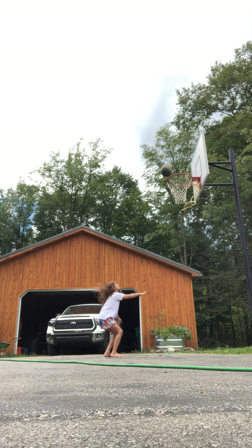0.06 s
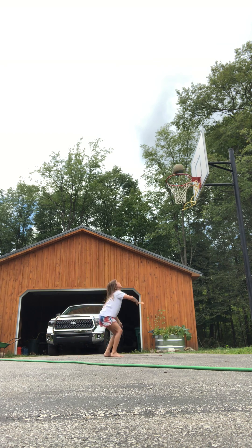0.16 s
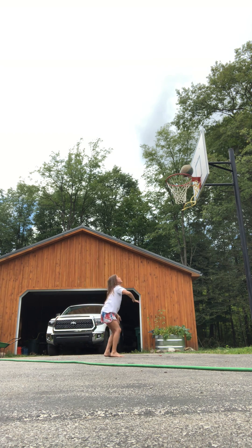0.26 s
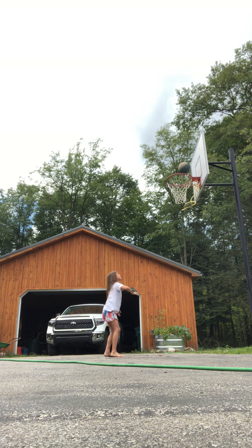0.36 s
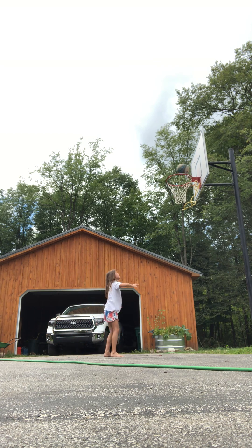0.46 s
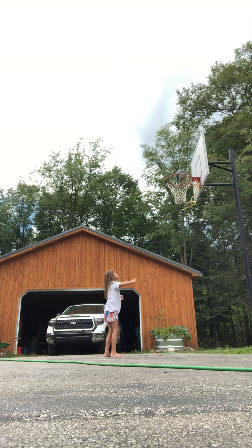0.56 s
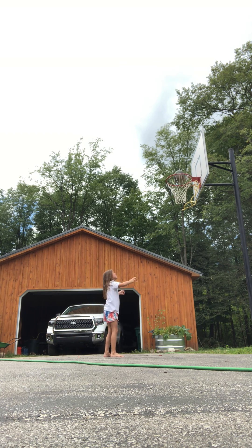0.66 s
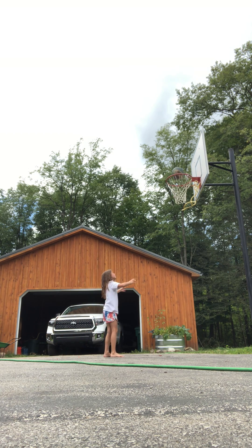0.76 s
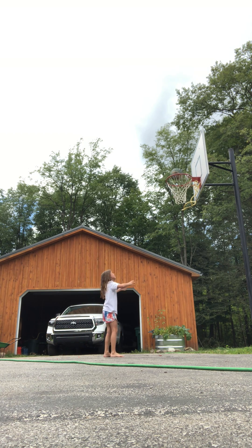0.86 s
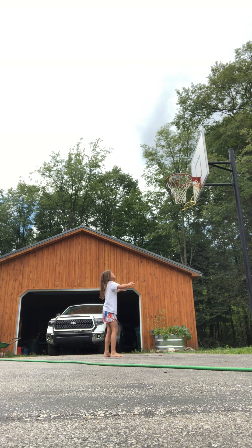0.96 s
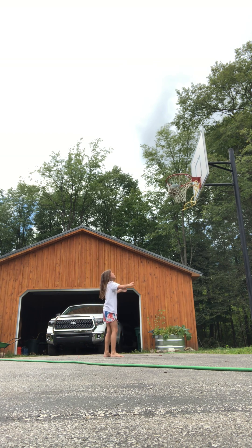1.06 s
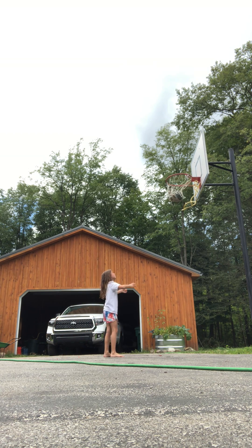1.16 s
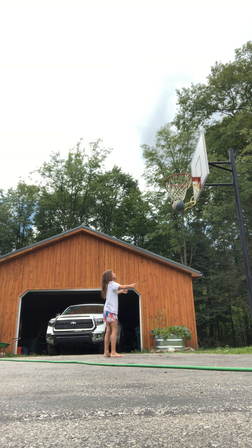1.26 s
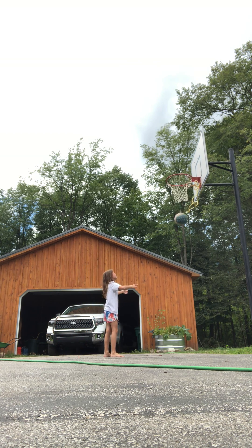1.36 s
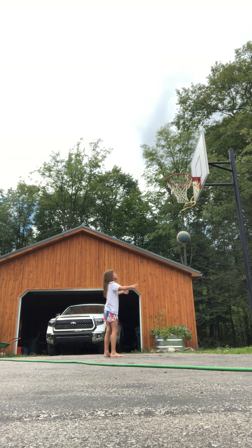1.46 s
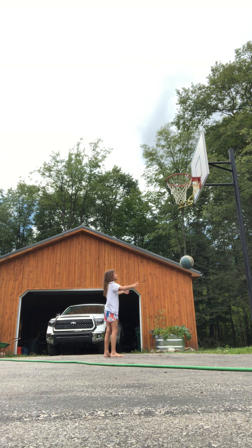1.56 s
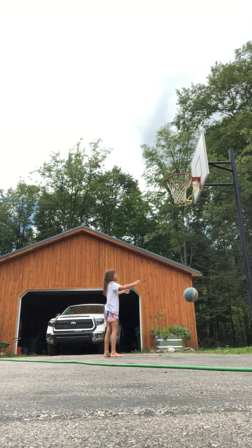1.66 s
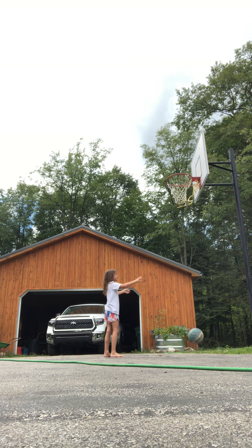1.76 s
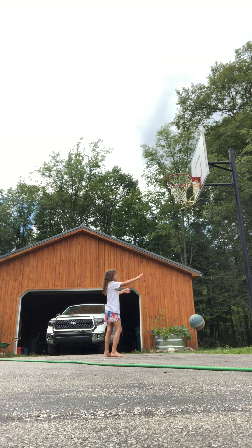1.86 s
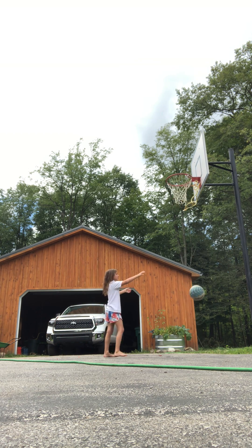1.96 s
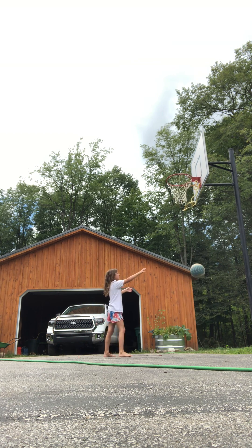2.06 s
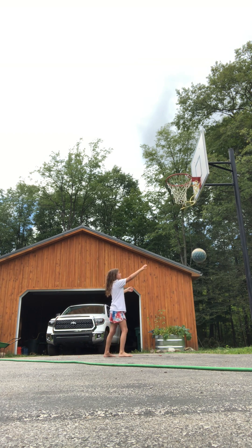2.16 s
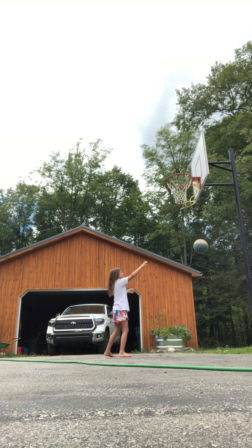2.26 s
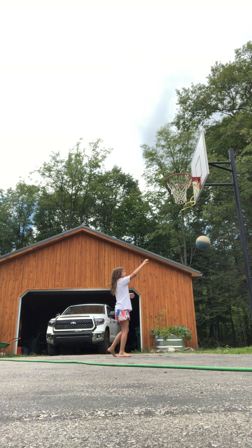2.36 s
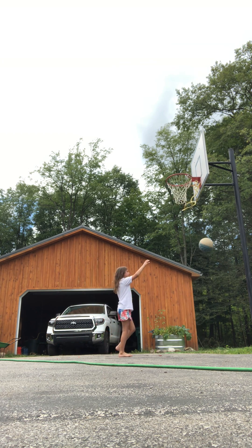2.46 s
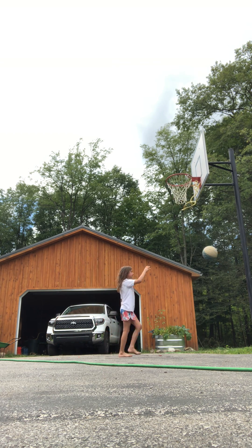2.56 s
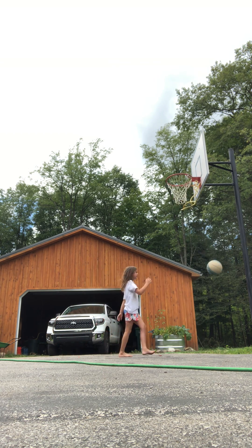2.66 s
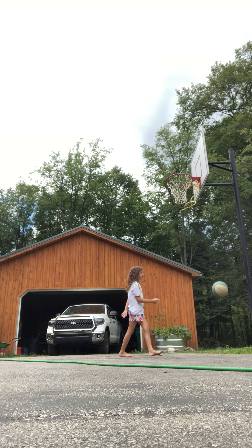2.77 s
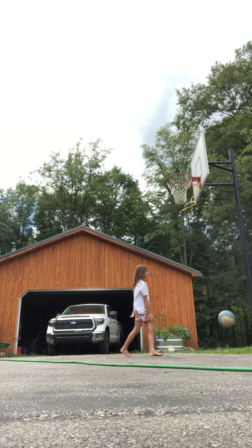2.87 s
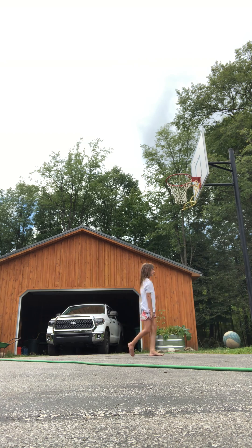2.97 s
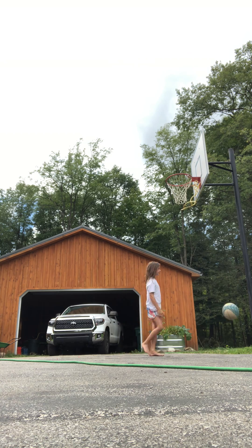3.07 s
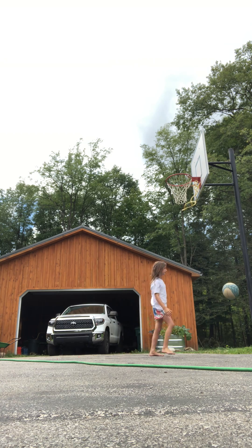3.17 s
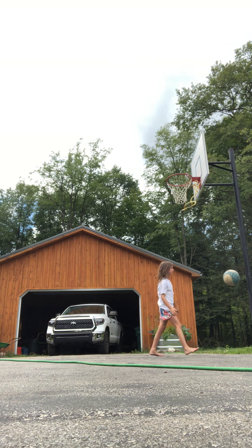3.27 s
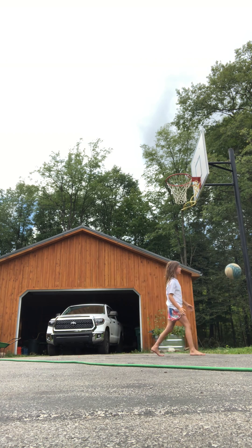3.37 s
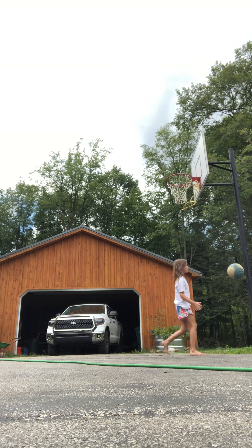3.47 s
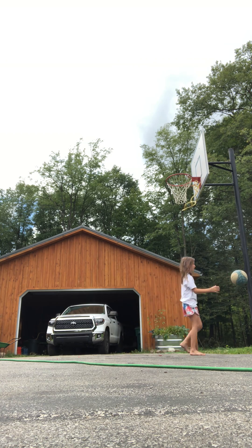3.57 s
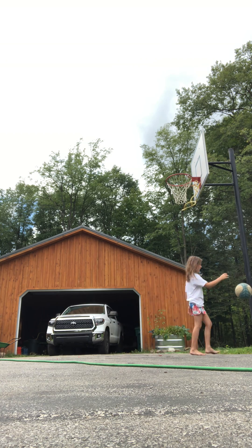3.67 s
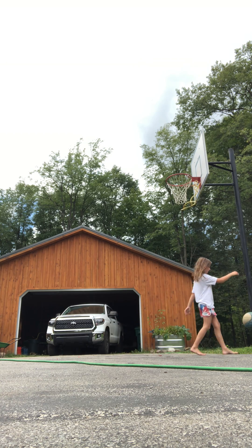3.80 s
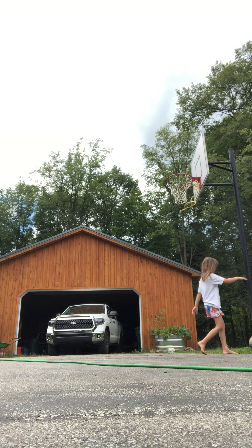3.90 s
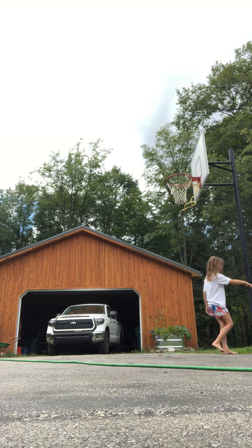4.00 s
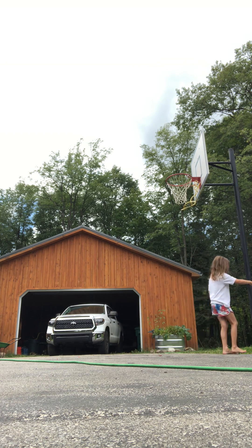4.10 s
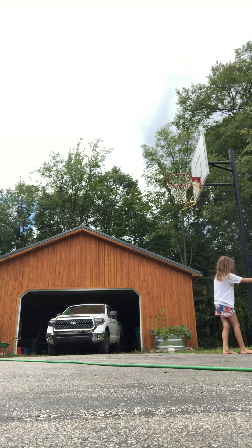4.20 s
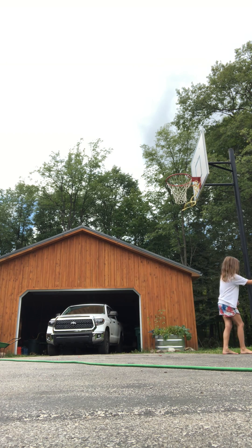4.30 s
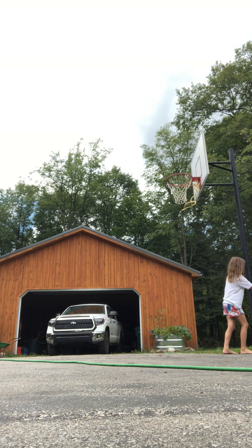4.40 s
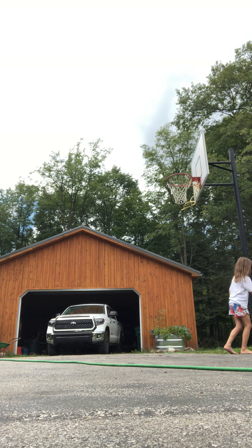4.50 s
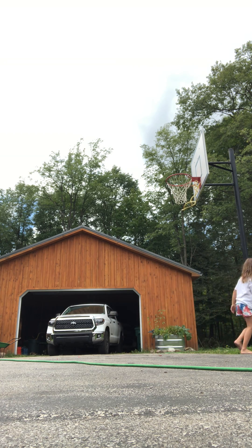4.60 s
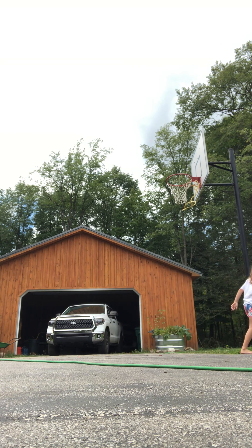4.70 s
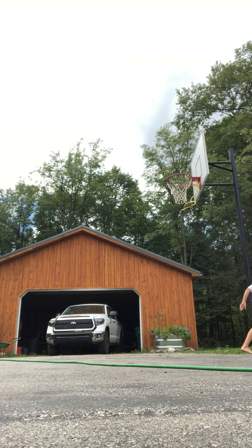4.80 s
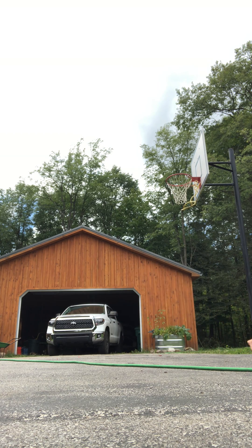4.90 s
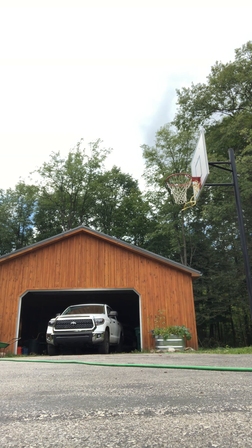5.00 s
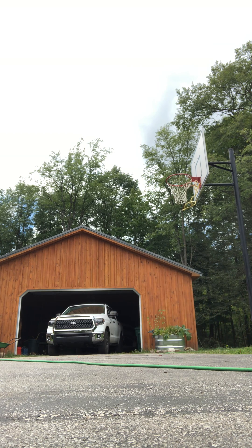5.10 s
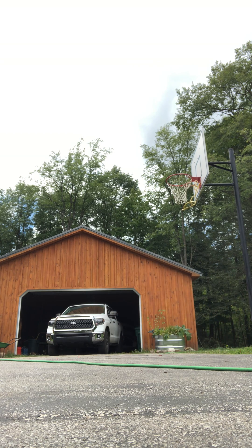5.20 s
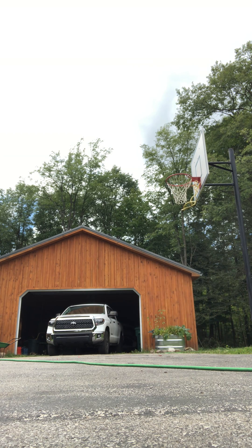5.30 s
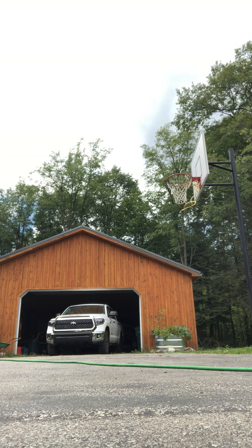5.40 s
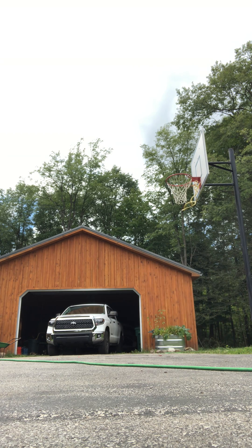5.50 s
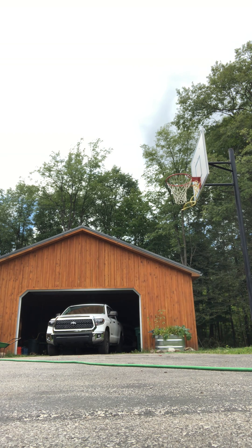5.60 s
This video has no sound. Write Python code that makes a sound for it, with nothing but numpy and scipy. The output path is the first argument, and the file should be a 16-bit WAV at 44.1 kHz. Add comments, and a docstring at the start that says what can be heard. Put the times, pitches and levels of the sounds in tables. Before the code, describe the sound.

A basketball knocks twice on a hoop, swishes through the net, then bounces three times on a driveway, each weaker, amid faint birdsong.

```python
"""A basketball knocks twice on the hoop, drags through the net, bounces three times on an asphalt driveway
and lands softly at its edge. Each blow sends a dispersive wave round the rubber shell, treble first and
thump last, and excites damped modes of the ball and its air. The net, scuffs and rustles are bursts of
shaped noise. Songbirds and a far crow are gliding sines; a garage and trees reflect the sounds.
Quiet outdoor air is coloured noise."""
import sys
import numpy as np
from scipy import signal
from scipy.fft import rfft, irfft
from scipy.io import wavfile

SR = 44100
rng = np.random.default_rng(int(sys.argv[2]) if len(sys.argv) > 2 else 0)


def master(y):
    """Save y as 16-bit WAV."""
    cut = np.clip(np.atleast_2d(y).T, -1, 1)
    pcm = np.round(cut * 32767)  # scale
    wavfile.write(sys.argv[1], SR, pcm.astype(np.int16))


N = 249157
TIME = np.arange(N) / SR
SIZE = 16384  # samples in one blow, burst or echo response
SHORT_TIME = np.arange(SIZE) / SR
FREQ = np.fft.rfftfreq(SIZE, 1 / SR)

# Levels in the tables are those before the final mix; spectra are relative.
# Outdoor air, spectrum of the far rumble: frequency_hz, level_db
RUMBLE_SPECTRUM = [(15, -49), (25, -17), (43, -6.5), (127, 2.5), (185, -1.5), (226, -1.5), (397, -7),
                   (438, -8.5), (977, -12), (3000, -21.5), (3900, -56), (6600, -120)]
# Leaf hiss, spectrum: frequency_hz, level_db
LEAF_SPECTRUM = [(1500, -29.5), (3000, 0.5), (4000, 1.5), (7300, -3), (9000, -6.5), (12000, -8.5),
                 (15500, -13.5)]
RUMBLE_DB, RUMBLE_FADE_DB_PER_S = -66, 0.59

# Hard surfaces that answer the bounces: delay_s, level_db, treble_limit_hz, smear_s
WALL_ECHOES = [(.040, -28, 6000, .005), (.0535, -20, 8000, .0045), (.1222, -23, 7000, .002),
               (.058, -20, 1200, .005), (.075, -22, 1000, .005), (.139, -18, 220, .006)]
# Scatter from the trees, spectrum: frequency_hz, level_db
TREE_SPECTRUM = [(50, -21), (120, -12), (400, -16.5), (1200, -23), (2900, -19), (5800, -16), (11500, -25)]
# Scatter from the trees, decay: frequency_hz, t60_s
TREE_DECAY = [(60, 1), (300, 0.23), (1200, 1), (3000, 0.97), (6000, 0.95), (15000, .35)]

# Caws of a far crow: start_s, level_db, overtone_db
CROW_CAWS = [(.828, -57.5, -26.5), (1.725, -56, -11)]
CAW_S, CAW_HZ, CAW_ARCH, CAW_RASP = 0.13, 1194, 0.12, 0.12  # arch and rasp are shares of the pitch

# Thin high song on one note: start_s, length_s, level_db
HIGH_SONG = [(3.534, .05, -76), (3.592, 0.061, -59), (3.68, .09, -69), (3.958, 0.087, -57),
             (4.305, 0.086, -59), (4.42, 0.104, -65), (4.54, 0.047, -58), (4.72, .085, -60.5)]
# The song starts sharp by the excess and settles exponentially to its final pitch
SONG_HZ, SONG_EXCESS_HZ, SONG_SETTLE_S = 5146, 191.3, 0.328
# Lower fluted notes: start_s, length_s, pitch_hz, level_db
FLUTED_NOTES = [(0.548, 0.042, 2480, -60), (0.963, 0.11, 2426, -65.5), (1.096, 0.14, 2680, -68.5),
                (1.16, 0.062, 2468, -61.5), (1.23, .08, 2520, -68.5), (2.025, 0.064, 3024, -66),
                (2.14, 0.072, 2906, -68.5), (2.38, 0.094, 3000, -68), (2.444, .12, 1970, -71),
                (2.52, 0.063, 2890, -70)]
NOTE_FALL_PER_S = 0.29  # share of the pitch lost per second
# Quick downward slurs: start_s, length_s, start_pitch_hz, level_db
DOWN_SLURS = [(0.301, 0.034, 3570, -71), (.52, 0.037, 3010, -65.5)]
SLUR_FALL_PER_S = 2.9  # share of the pitch lost per second
# Buzzy songbird calls: start_s, length_s, pitch_hz, level_db, rasp_share
BUZZY_CALLS = [(0.313, .071, 2753, -62.5, 0.104), (0.398, 0.25, 2284, -68.5, 0.0364),
               (4.853, .18, 3950, -68.5, 0.023), (4.9, .27, 4350, -72.5, .066)]
# Two-part chips of a second bird: start_s, level_db
CHIP_CALLS = [(3.552, -70.5), (3.935, -66), (4.268, -66.5), (4.478, -67), (4.685, -69)]
CHIP_HIGH_HZ, CHIP_LOW_HZ, CHIP_FALL = 7350, 5150, 0.13  # the fall is a share of the pitch
CHIP_S, CHIP_GAP_S, CHIP_LOW_DB = 0.024, 0.106, 2  # the gap runs from start to start

# Feet and ball scuffing the ground: start_s, level_db, centre_hz, t60_s
GROUND_SCUFFS = [(.048, -54.5, 1510, 0.082), (4.629, -47, 1100, 0.15), (4.7917, -49, 1900, 0.03)]
SCUFF_RISE_S, SCUFF_OCTAVES = 0.0012, 1.2
# Dry rustles at the edge of the drive: start_s, level_db, rise_s
DRY_RUSTLES = [(3.916, -51, 0.0077), (4.765, -57.5, 0.045), (4.815, -50, 0.0056), (5.019, -61, .01)]
RUSTLE_HZ, RUSTLE_OCTAVES, RUSTLE_FALL = 7600, 4.8, 3.8  # the t60 is this many rise times

# Net friction, spectrum: frequency_hz, level_db
NET_SPECTRUM = [(100, -17), (250, -14), (370, 3.5), (600, -7), (980, 5), (1400, -18), (2800, -18),
                (5000, -36.5), (11000, -36.5), (14500, -37), (16000, -40)]
DRAG_S, DRAG_DB = 1.066, -52
DRAG_ATTACK_S, DRAG_HOLD_S, DRAG_RELEASE_S = 0.032, 0.059, 0.057
# Net cords snapping taut: start_s, level_db, centre_hz, width_octaves, t60_s
CORD_SNAPS = [(1.077, -49, 905, 2, .04), (1.3067, -44.5, 750, 2.8, .07), (1.34, -44, 1091, .5, 0.044),
              (1.364, -36.5, 2947, .8, .02), (1.365, -47, 856, 1.7, .24)]
SNAP_RISE_S = 0.0007

# Wave in the rubber shell, spectrum: frequency_hz, level_db
SHELL_SPECTRUM = [(30, -23), (60, 3.5), (105, 10.5), (170, 3), (280, 2.5), (470, -1), (630, -5.5),
                  (800, 3.5), (1300, -5.5), (2400, -6), (3300, -7), (4100, -12.5), (5400, -16.5),
                  (7500, -25), (11000, -35.5), (16000, -47)]
# Modes of the ball and its air: frequency_hz, level_db, t60_s
AIR_MODES = [(114, -23, 0.23), (203, -38.5, 0.2), (286, -26, 0.056), (390, -29, 0.028), (554, -28.5, 0.093),
             (737, -24.5, 0.08), (885, -20.5, 0.069), (977, -19, 0.082), (1143, -19.5, 0.074),
             (1400, -20.5, .056), (1470, -21, 0.06), (1548, -23.5, 0.07), (1668, -25.5, 0.089),
             (1765, -22.5, 0.065), (2040, -36, 0.096), (2262, -41.5, 0.55), (2480, -40.5, 0.11),
             (2650, -37.5, 0.033), (2830, -40, .17), (3190, -44.5, 0.1), (3368, -46.5, 0.26),
             (3570, -46, 0.11), (4010, -47, 0.15), (4190, -44, 0.07)]
# Modes of the steel rim: frequency_hz, level_db, t60_s
RIM_MODES = [(188, -14, 0.094), (952, -26.5, 0.11), (2330, -29, 0.09), (4827, -26.5, 0.037),
             (5800, -28, 0.025)]
# Modes of the backboard: frequency_hz, level_db, t60_s
BOARD_MODES = [(324, -23, 0.06), (360, -20.5, 0.3), (406, -19.5, 0.37), (470, -25.5, 0.24)]
# Knocks on the hoop: start_s, level_db, rim_ring_db, board_ring_db
HOOP_KNOCKS = [(0.2827, -37.5, 7.5, -6), (.6565, -45.5, -16, 9.5)]
HOOP_CONTACT_S, HOOP_THUMP_DB, HOOP_SMACK_HZ, HOOP_SMACK_DB = 0.0047, 10.5, 2870, 5
# Bounces on the asphalt: start_s, level_db, contact_s, smack_hz, smack_db, treble_db
ASPHALT_BOUNCES = [(1.8389, -10.5, .0105, 1500, 7.5, 1.5), (2.9842, -14, .0125, 2420, 5.5, -5),
                   (3.9239, -23.5, 0.015, 1360, 6, 2)]
# Thump of the hardest bounce (dB), growth (dB per dB weaker), upper edge (Hz)
THUMP_DB, THUMP_GROWTH, THUMP_HZ = 5, 0.5, 260
SMACK_OCTAVES, AIR_DB = 0.49, 1.5
ROUGHNESS_S = 0.007  # decay constant of the noise that roughens each blow
TREBLE_HZ = 6000  # the treble of each bounce is raised or lowered above this
LANDING_S, LANDING_DB, LANDING_CONTACT_S = 4.647, -44.5, 0.013
LANDING_THUMP_DB, LANDING_TOP_HZ = 14, 1500  # the ground here is soft
TOP_HZ = 15800  # upper limit of the whole sound


def undb(db):
    """The decibel law: 20 dB is a tenfold amplitude."""
    return 10 ** (np.asarray(db) / 20)


def along(points, hz):
    """Linear interpolation of (frequency, value) points on a logarithmic frequency axis."""
    f, value = np.transpose(points)
    return np.interp(np.log(hz + 1), np.log(f), value)


def colour(x, points):
    """Spectral shaping: each component of x is weighted by the points, then rms is set to 1."""
    gain = undb(along(points, np.fft.rfftfreq(len(x), 1 / SR)))
    y = irfft(rfft(x) * gain, len(x))
    return y / y.std()


def causal(db):
    """Minimum phase: a causal cepstrum ties the phase to the given gain on FREQ."""
    cepstrum = irfft(np.log(undb(db)))
    cepstrum[1:SIZE // 2] *= 2
    cepstrum[SIZE // 2 + 1:] = 0
    return np.exp(rfft(cepstrum))


def low_pass(x, hz, order=2):
    """Maximally flat filtering that attenuates components above hz."""
    return signal.sosfilt(signal.butter(order, hz, fs=SR, output="sos"), x)


def band(x, lo_hz, hi_hz):
    """Causal band-pass filtering between two edges."""
    edges = [lo_hz, min(hi_hz, SR / 2 - 100)]
    return signal.sosfilt(signal.butter(2, edges, "band", fs=SR, output="sos"), x)


def walk(rate, count):
    """Random fluctuation: normal values, rate per second, joined by straight lines."""
    knots = rng.standard_normal(2048)
    return np.interp(np.arange(count) / SR * rate, np.arange(len(knots)), knots, period=len(knots))


def add(out, s, x):
    """Superposition: x is summed into out from time s."""
    i = max(int(s * SR), 0)
    out[i:i + len(x)] += x[:max(len(out) - i, 0)]


def calm(sway_db=0.07, rumble_top_hz=3000, leaves_db=-78):
    """Coloured noise: far rumble that sways and slowly eases, under steady faint leaf hiss."""
    rumble = low_pass(colour(rng.standard_normal(N), RUMBLE_SPECTRUM), rumble_top_hz, order=3)
    swell = undb(RUMBLE_DB - RUMBLE_FADE_DB_PER_S * TIME + sway_db * walk(5.2, N))
    hiss = undb(leaves_db) * colour(rng.standard_normal(N), LEAF_SPECTRUM)
    return rumble * swell + hiss


def trees(build_s=0.025, clump_db=2):
    """Multiple scattering: clumped reflections from trunks and leaves decay at a rate set by octave."""
    t, out = TIME[:SR], 0
    clumps = undb(clump_db * walk(160, SR))
    build = 1 - np.exp(-(t / build_s) ** 2)
    for hz in 45 * 2. ** np.arange(9):
        noise = band(rng.standard_normal(SR), hz / np.sqrt(2), hz * np.sqrt(2))
        envelope = clumps * build * undb(-60 * t / along(TREE_DECAY, hz))
        out = out + undb(along(TREE_SPECTRUM, hz)) * noise * envelope / np.linalg.norm(envelope)
    return out


def walls():
    """Reflection: the direct sound precedes smeared, dulled echoes from the driveway and garage."""
    out = np.zeros(SIZE)
    out[0] = 1
    for delay_s, db, hz, smear_s in WALL_ECHOES:
        diffuse = smear_s / (smear_s + 0.0015)  # deep, ribbed surfaces leave little of a mirror echo
        scatter = rng.standard_normal(SIZE) * np.exp(-SHORT_TIME / smear_s)
        scatter *= diffuse / np.linalg.norm(scatter)
        scatter[0] += 1 - diffuse
        add(out, delay_s, undb(db) * low_pass(scatter, min(hz, 18000)))
    return out


def rasp(length_s, hz, shake, arch=0, overtone=0, flutter_db=3.0):
    """Frequency modulation: a call turns hoarse when its arching pitch shakes rapidly at random."""
    count = int(length_s * SR)
    swell = np.sin(np.linspace(0, np.pi, count))
    pitch = hz * (1 + arch * swell + shake * walk(490, count))
    phase = 2 * np.pi * np.cumsum(pitch) / SR
    voice = np.sin(phase) + overtone * np.sin(2 * phase)
    return swell * undb(flutter_db * walk(400, count)) * voice


def crow():
    """Harmonic voice: each of two alike caws is a hoarse fundamental with its octave."""
    out = np.zeros(N)
    for s, db, overtone_db in CROW_CAWS:
        add(out, s, undb(db) * rasp(CAW_S, CAW_HZ, CAW_RASP, CAW_ARCH, undb(overtone_db)))
    return out


def whistle(length_s, hz, fall, waver, flutter_db=2.5):
    """Pure tone: a single sine loses a share of its pitch and wavers a little."""
    count = int(length_s * SR)
    pitch = hz * np.linspace(1, 1 - fall, count) * (1 + waver * walk(250, count))
    tone = np.sin(2 * np.pi * np.cumsum(pitch) / SR)
    return signal.windows.tukey(count, 0.5) * undb(flutter_db * walk(70, count)) * tone


def songbirds():
    """Gliding tones: a high song settles in pitch beside fluted notes, slurs and buzzy calls."""
    out = np.zeros(N)
    for s, length_s, db in HIGH_SONG:
        hz = SONG_HZ + SONG_EXCESS_HZ * np.exp((HIGH_SONG[0][0] - s) / SONG_SETTLE_S)
        add(out, s, undb(db) * whistle(length_s, hz, fall=0.0051, waver=0.0032))
    for s, length_s, hz, db in FLUTED_NOTES:
        add(out, s, undb(db) * whistle(length_s, hz, NOTE_FALL_PER_S * length_s, waver=0.01))
    for s, length_s, hz, db in DOWN_SLURS:
        add(out, s, undb(db) * whistle(length_s, hz, SLUR_FALL_PER_S * length_s, waver=0.016))
    for s, length_s, hz, db, shake in BUZZY_CALLS:
        add(out, s, undb(db) * rasp(length_s, hz, shake))
    return out


def chips(waver=0.023, scatter=0.01):
    """Rapid glides: a high downward flick is answered by a lower one, both retuned at each chip."""
    out = np.zeros(N)
    tunings = 1 + scatter * rng.standard_normal(len(CHIP_CALLS))
    for (s, db), tune in zip(CHIP_CALLS, tunings):
        high = whistle(CHIP_S, tune * CHIP_HIGH_HZ, CHIP_FALL, waver)
        low = whistle(CHIP_S, tune * CHIP_LOW_HZ, CHIP_FALL, waver)
        add(out, s, undb(db) * high)
        add(out, s + CHIP_GAP_S, undb(db + CHIP_LOW_DB) * low)
    return out


def burst(hz, octaves, rise_s, t60, grain_db=3):
    """Friction: gritty band-limited noise rises linearly and decays exponentially."""
    edge = 2 ** (octaves / 2)
    grains = rng.standard_normal(SIZE) * undb(grain_db * walk(900, SIZE))
    grit = band(grains, hz / edge, hz * edge)
    decay = undb(-60 * np.maximum(SHORT_TIME - rise_s, 0) / t60)
    envelope = np.minimum(SHORT_TIME / rise_s, 1) * decay
    return envelope * grit / (2 * grit.std())


def ground():
    """Friction noise: scuffs on the asphalt occupy a narrow band, rustles beside it a wide bright one."""
    out = np.zeros(N)
    for s, db, hz, t60 in GROUND_SCUFFS:
        add(out, s, undb(db) * burst(hz, SCUFF_OCTAVES, SCUFF_RISE_S, t60))
    for s, db, rise_s in DRY_RUSTLES:
        add(out, s, undb(db) * burst(RUSTLE_HZ, RUSTLE_OCTAVES, rise_s, RUSTLE_FALL * rise_s))
    return out


def net(slip_db=0.5, body_db=-50):
    """Stick and slip: the cords drag over the pebbled rubber, then snap taut."""
    slips = rng.standard_normal(N) * undb(slip_db * walk(180, N))
    corners = DRAG_S + np.cumsum([0, DRAG_ATTACK_S, DRAG_HOLD_S, DRAG_RELEASE_S])
    out = colour(slips, NET_SPECTRUM) * undb(DRAG_DB) * np.interp(TIME, corners, [0, 1, 1, 0])
    for s, db, hz, octaves, t60 in CORD_SNAPS:
        add(out, s, undb(db) * burst(hz, octaves, SNAP_RISE_S, t60))
    # a low rustle of the net's body follows the last snap
    body_rustle = burst(hz=416, octaves=0.53, rise_s=0.014, t60=0.27)
    add(out, CORD_SNAPS[-1][0], undb(body_db) * body_rustle)
    return out


def ring(modes, detune=0.0013):
    """Modal decay: a struck body is a sum of damped sines, slightly retuned by every blow."""
    out = np.zeros(SIZE)
    for hz, db, t60 in modes:
        tuned_hz = hz * (1 + detune * rng.standard_normal())
        out += undb(db - 60 * SHORT_TIME / t60) * np.sin(2 * np.pi * tuned_hz * SHORT_TIME)
    return out


def split_response(kind, hz):
    """Crossover: the complex response on FREQ of a third-order low-pass or high-pass filter."""
    return signal.freqz(*signal.butter(3, hz, kind, fs=SR), FREQ, fs=SR)[1]


def blow(contact_s, thump_db, smack_hz, smack_db, rings=0, treble_db=0, lag_s=0.03, bend_hz=110,
         split_hz=1550, trip_s=0.0007, lift_db=-8, lift_hz=1700, ring_rise_s=0.0012, roughness_db=-9):
    """Dispersion: the skin cracks at once, low waves creep round the shell, and lift-off knocks again."""
    delay = trip_s + lag_s / (1 + FREQ / bend_hz)
    creep = np.exp(-2j * np.pi * np.cumsum(delay) * SR / SIZE)  # phase is the integral of the delay
    slow, fast = split_response("low", split_hz), split_response("high", split_hz)
    # a short decaying noise roughens the treble of each blow
    noise = rng.standard_normal(SIZE) * np.exp(-SHORT_TIME / ROUGHNESS_S)
    roughness = fast * rfft(noise) * undb(roughness_db) / np.linalg.norm(noise)
    thump = thump_db / (1 + (FREQ / THUMP_HZ) ** 2)
    octaves_off = np.log2((FREQ + 1) / smack_hz)
    smack = smack_db * np.exp(-0.5 * (octaves_off / SMACK_OCTAVES) ** 2)
    treble = treble_db * FREQ ** 4 / (FREQ ** 4 + TREBLE_HZ ** 4)
    shell = causal(along(SHELL_SPECTRUM, FREQ) + thump + smack + treble)
    wave = irfft(shell * (fast + roughness + slow * creep)) * np.linspace(1, 0, SIZE)
    wave /= abs(signal.hilbert(wave)).max()
    out = wave + rings * (1 - np.exp(-SHORT_TIME / ring_rise_s))
    add(out, contact_s, undb(lift_db) * band(wave, 270, lift_hz))
    return out


def ball():
    """Impact: two hoop knocks, three bounces that grow weaker and rounder, and a dull landing."""
    out = np.zeros(N)
    hardest_db = max(row[1] for row in ASPHALT_BOUNCES)
    for s, db, rim_db, board_db in HOOP_KNOCKS:
        rings = undb(rim_db) * ring(RIM_MODES) + undb(board_db) * ring(BOARD_MODES)
        knock = blow(HOOP_CONTACT_S, HOOP_THUMP_DB, HOOP_SMACK_HZ, HOOP_SMACK_DB, rings)
        add(out, s, undb(db) * knock)
    for s, db, contact_s, smack_hz, smack_db, treble_db in ASPHALT_BOUNCES:
        thump_db = THUMP_DB + THUMP_GROWTH * (hardest_db - db)
        rings = undb(AIR_DB) * ring(AIR_MODES)
        add(out, s, undb(db) * blow(contact_s, thump_db, smack_hz, smack_db, rings, treble_db))
    landing = blow(LANDING_CONTACT_S, LANDING_THUMP_DB, smack_hz=496, smack_db=8, rings=ring(AIR_MODES))
    add(out, LANDING_S, undb(LANDING_DB) * band(landing, 20, LANDING_TOP_HZ))
    return out


def scene(bird_direct_db=-3, bird_wet_db=15.5, bird_damp_hz=3800, chip_wet_db=15, net_wet_db=8):
    """Direct and scattered sound: walls answer the ball; net, ground and birds carry more of the trees."""
    play, friction = ball(), net() + ground()
    song, flicks = songbirds() + crow(), chips()
    # the song and caws reach the trees with their treble reduced, so their reverberation is duller
    soft_song = low_pass(song, bird_damp_hz)
    near = signal.fftconvolve(play, walls())[:N]
    to_trees = play + undb(net_wet_db) * friction
    to_trees += undb(bird_wet_db) * soft_song + undb(chip_wet_db) * flicks
    far = signal.fftconvolve(to_trees, trees())[:N]
    birds = undb(bird_direct_db) * (song + flicks)
    return (near + friction + birds + far + calm())[None]


def record(dry, low_cut_hz=36):
    """Band limitation: a high-pass sheds the deepest rumble and a steep low-pass cuts the top."""
    thin = signal.sosfilt(signal.butter(3, low_cut_hz, "high", fs=SR, output="sos"), dry)
    return signal.sosfilt(signal.ellip(10, 0.1, 70, TOP_HZ, fs=SR, output="sos"), thin)


dry = scene()
out = record(dry)
master(out)
```